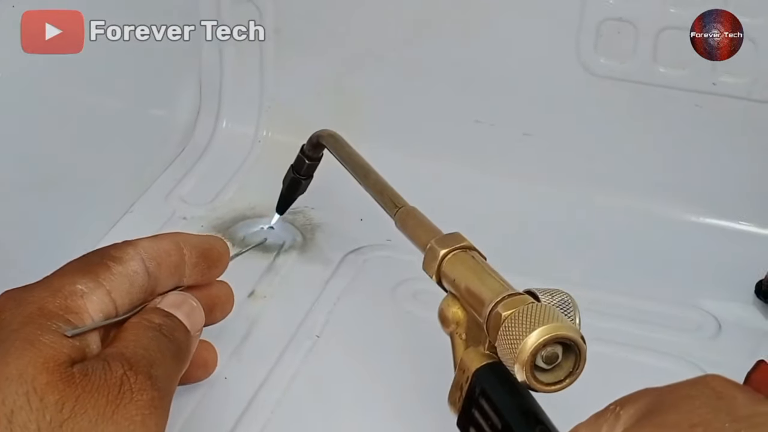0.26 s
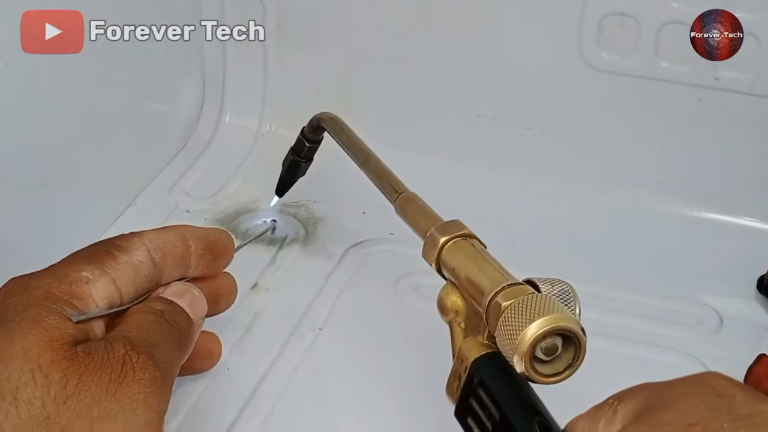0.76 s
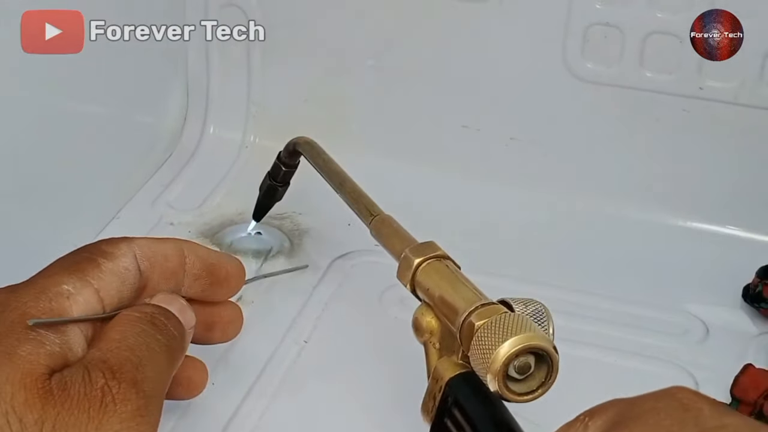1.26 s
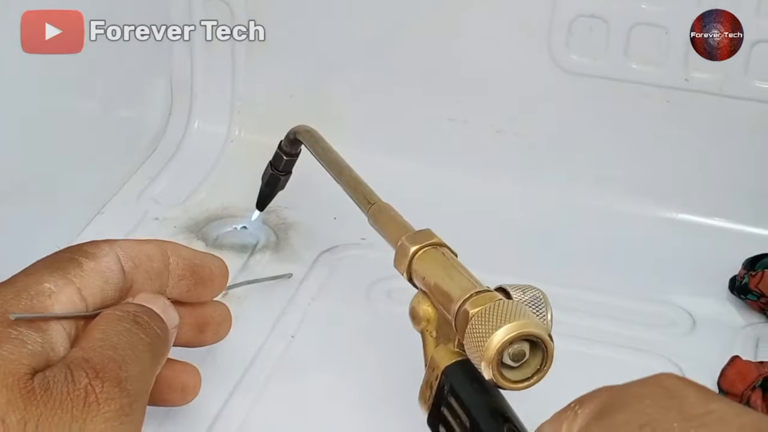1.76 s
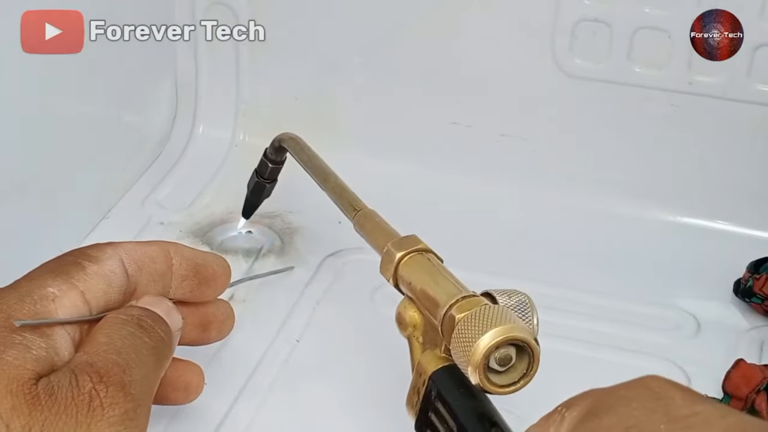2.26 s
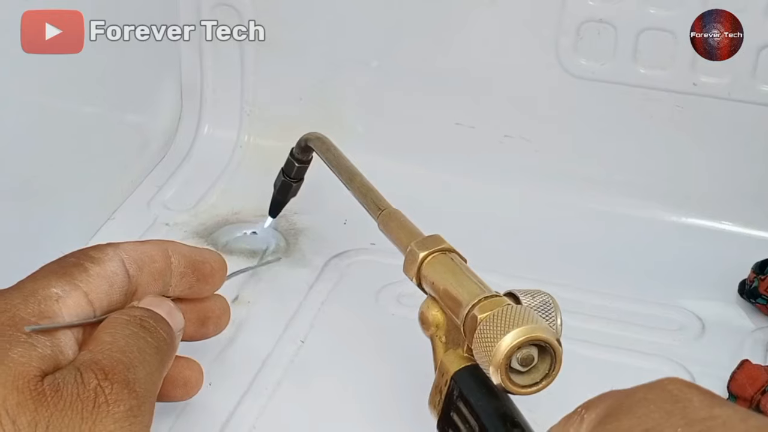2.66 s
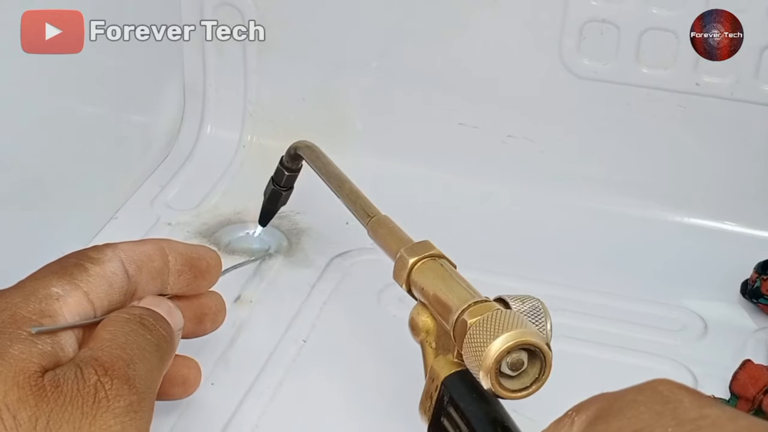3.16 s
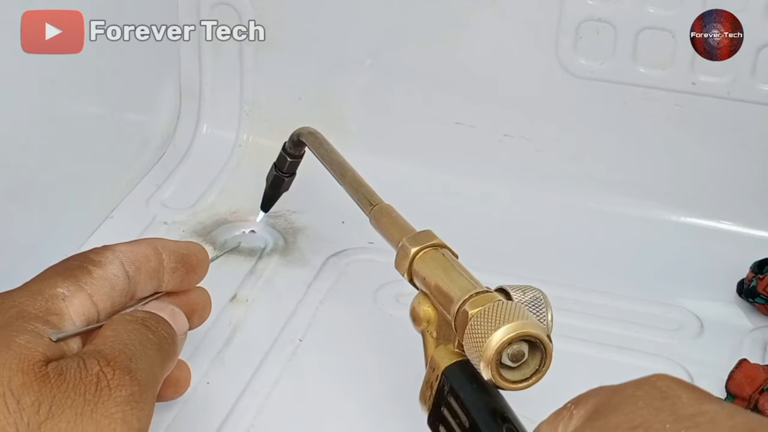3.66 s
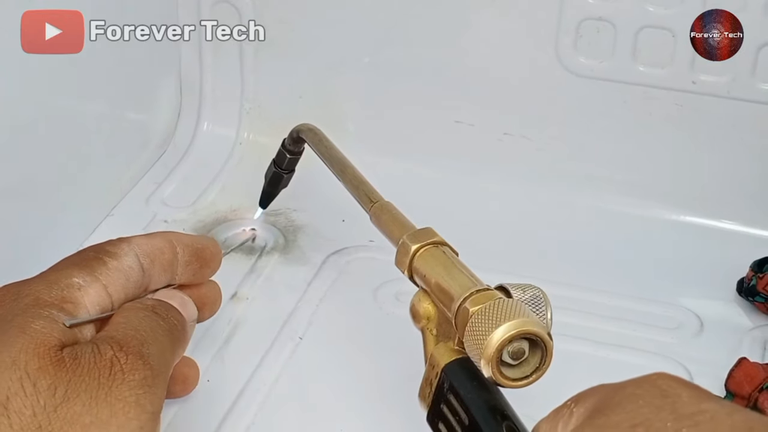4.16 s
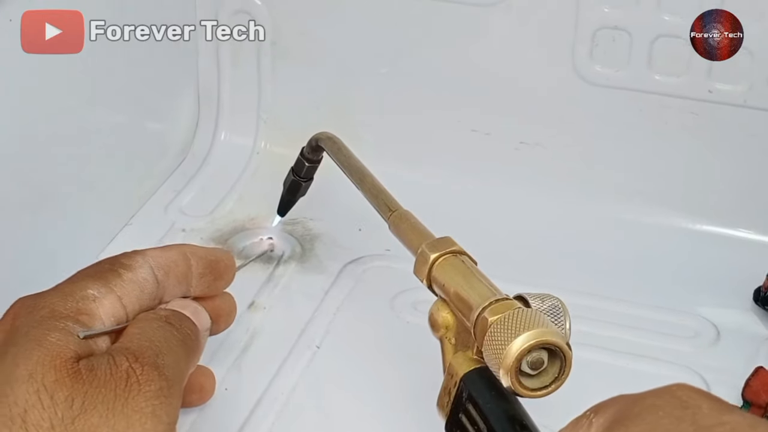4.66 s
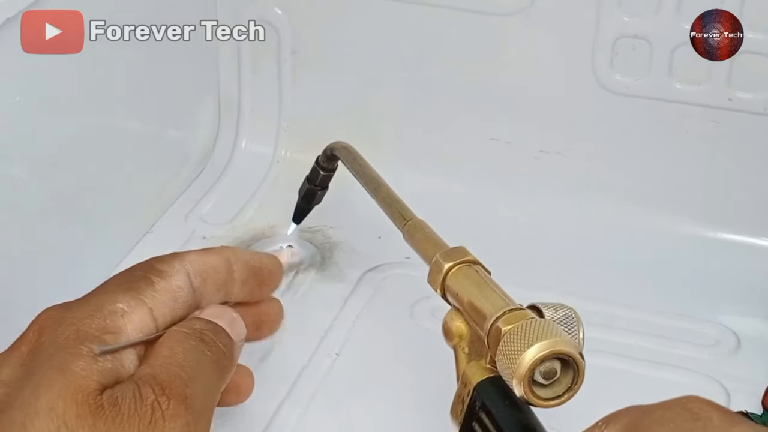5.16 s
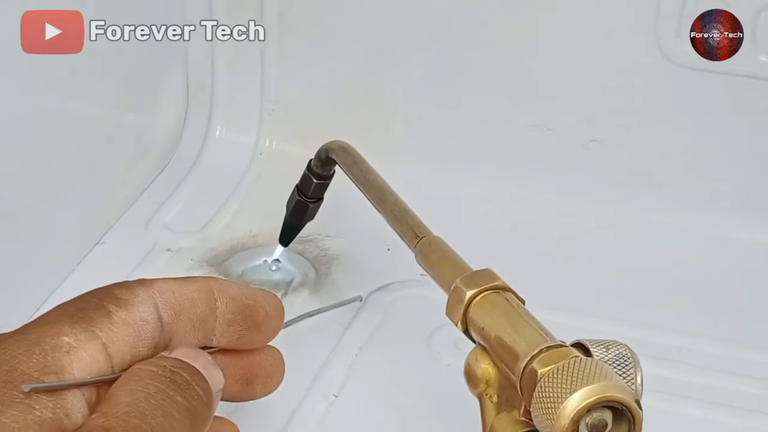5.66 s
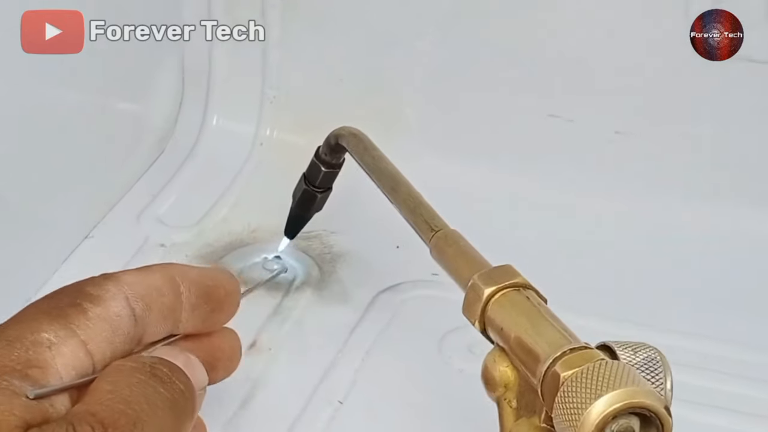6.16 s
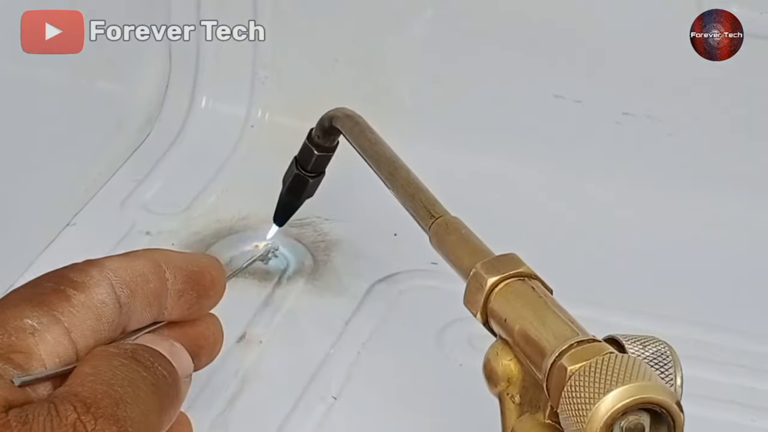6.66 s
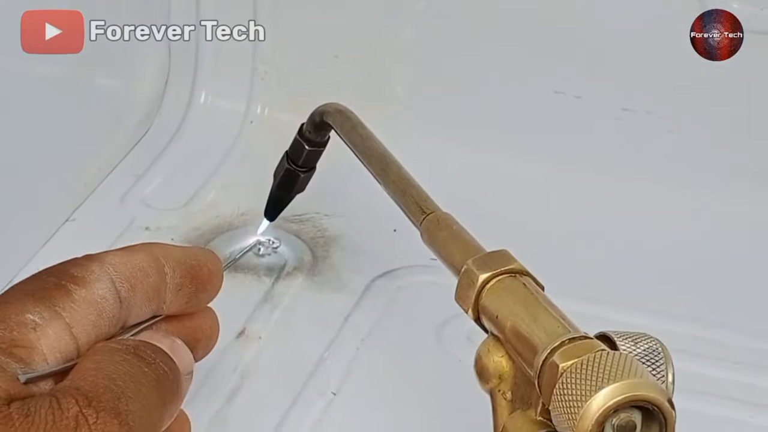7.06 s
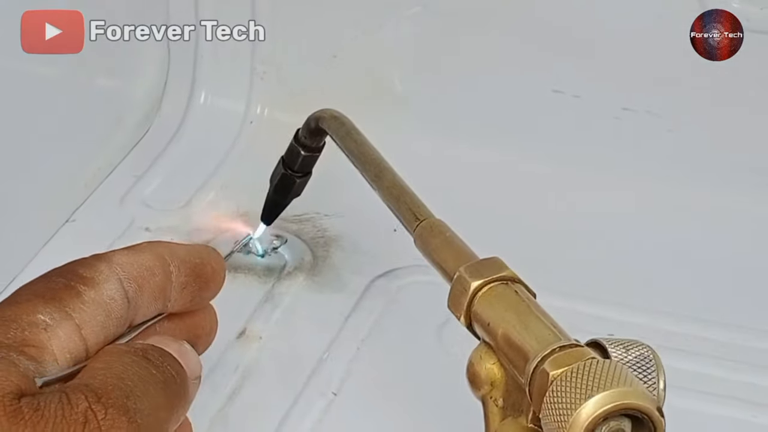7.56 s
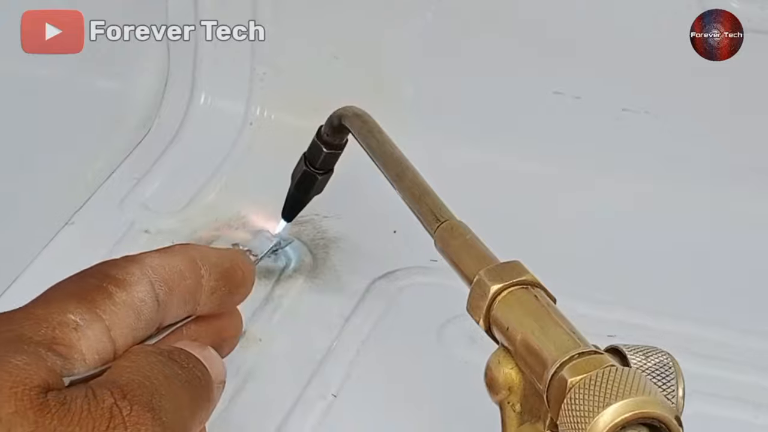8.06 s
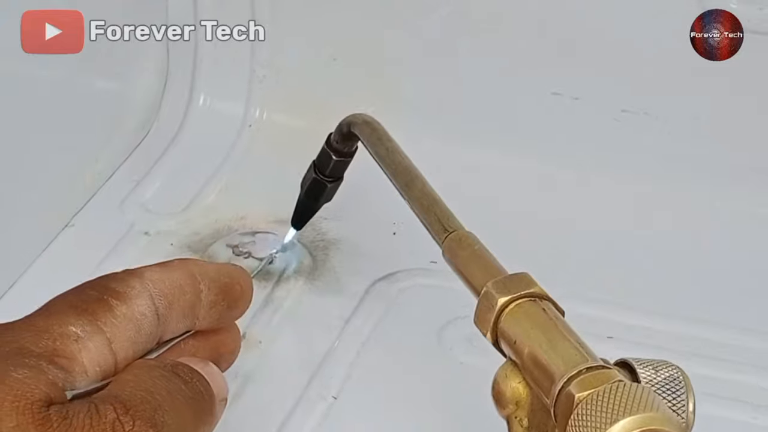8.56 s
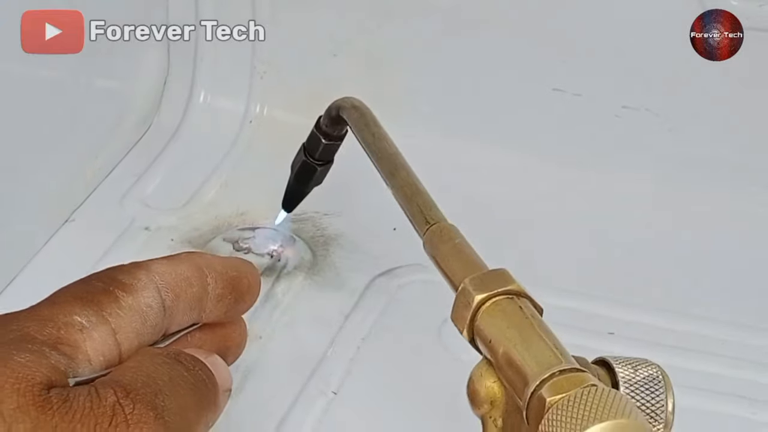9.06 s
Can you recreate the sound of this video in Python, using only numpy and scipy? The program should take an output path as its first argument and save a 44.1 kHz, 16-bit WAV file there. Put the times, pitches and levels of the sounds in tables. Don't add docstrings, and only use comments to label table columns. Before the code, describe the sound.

A small gas torch burns steadily inside a hollow metal cabinet, its bright hiss riding over a fluttering, popping roar, recorded close.

```python
import sys
import numpy as np
from scipy import signal
from scipy.fft import rfft, irfft
from scipy.io import wavfile
from scipy.ndimage import uniform_filter1d

SR = 44100
rng = np.random.default_rng(int(sys.argv[2]) if len(sys.argv) > 2 else 0)


def output_pcm(signal):
    pcm = np.clip(np.atleast_2d(signal).T, -1, 1) * 32767
    wavfile.write(sys.argv[1], SR, np.round(pcm).astype(np.int16))


def decibels_to_gain(level_db):
    exponent = np.asarray(level_db, float) / 20
    return 10 ** exponent


N = 410130

# time in seconds, flame strength in dB,
# jet sharpness in dB (how squarely the jet strikes the metal).
TORCH = [(0, 4, -5), (.55, -0.5, 0.5), (1.3, 1.5, -1), (1.65, 1.5, -6), (1.9, 1, 2.5), (2.4, 0.5, -1),
         (2.7, .5, -1.5), (3.35, 1, -0.5), (3.6, 0, 0), (4.2, -.5, 0.5), (4.85, 0.5, 0), (5.3, .5, 0),
         (5.85, -1, -5.5), (6.25, 0, 2), (7.2, -1, 0), (8.1, 1, -5), (8.85, 0, 4), (9.3, 1, -8)]
STILL_START_S, STILL_LENGTH_S, STILL_DB = 7.56, 0.292, -0.5


def evened(x):
    return x / np.sqrt(np.mean(x ** 2) + 1e-20)


def along(table, t):
    s, *columns = np.transpose(table)
    return [np.interp(t, s, column) for column in columns]


def wobble(lo_hz, hi_hz, count):
    hz = np.fft.rfftfreq(count, 1 / SR)
    spectrum = rfft(rng.standard_normal(count))
    return evened(irfft(spectrum * hz / (hz + lo_hz) / (1 + (hz / hi_hz) ** 2), count))


def span(t, start, length):
    return np.clip(np.minimum(t - start, start + length - t) / 0.01 + .5, 0, 1)


def flare_rows():
    # start in seconds, snap level in dB, low thud level in dB.
    strong_flares = [(0.319, -10.5, -22), (0.854, -15, -27), (0.933, -12, -24), (1.025, -17, -18.5),
                     (1.165, -21, -24), (1.496, -16, -36), (1.563, -18, -26), (1.803, -23, -35),
                     (2.024, -14, -39), (2.21, -18, -30), (2.565, -18, -23), (3.38, -8, -33),
                     (4.326, -7, -33), (4.558, -9, -20), (4.805, -7.5, -42), (4.998, -12, -21),
                     (5.223, -11, -19), (5.369, -11, -28), (5.437, -20, -31), (5.569, -10.5, -37),
                     (5.911, -13, -36), (6.205, -12, -36), (7.128, -22, -26), (7.265, -9, -26),
                     (7.334, -24, -28), (7.45, -9, -22), (7.94, -8, -30), (8.597, -14, -26),
                     (8.758, -9.5, -25), (9.064, -24, -32)]
    flares_per_s, spread_db = 36, 6
    s, snap_db, thud_db = np.transpose(strong_flares)
    gap, thud_chance, snap_chance = rng.random((400, 3)).T
    at = np.cumsum((.4 + 1.2 * gap) / flares_per_s)
    clear = abs(at[:, None] - s).min(1) > .025
    free = (at < N / SR) & clear & (span(at, STILL_START_S, STILL_LENGTH_S) < .5)
    small_thud_db = -4 + spread_db * (thud_chance - .5)
    small_snap_db = -4.5 + spread_db * (snap_chance - .5)
    times = np.r_[s, at[free]]
    thuds_db = -4.5 + np.r_[thud_db - thud_db.mean(), small_thud_db[free]]
    snaps_db = np.r_[snap_db - snap_db.mean() + 2, small_snap_db[free]]
    return times, thuds_db, snaps_db


def small_pops():
    pops_per_s, spread_db, clump_db, gust_share = 340, 2.0, 4, 0.24
    clumps = decibels_to_gain(clump_db * np.tanh(wobble(4.8, 32, N)))
    lit = rng.random(N) < pops_per_s / SR
    sign = rng.choice([-1., 1.], N)
    pops = lit * sign * decibels_to_gain(spread_db * np.minimum(rng.exponential(1, N), 1.8))
    gusts = rng.standard_normal(N)
    mix = np.sqrt(1 - gust_share) * evened(pops) + np.sqrt(gust_share) * gusts
    return signal.lfilter([1, -.97], [1, -.94], evened(clumps * mix))


def flares():
    thud_top_hz, snap_top_hz = 657, 1180
    s, thud_db, snap_db = flare_rows()
    trains = np.zeros((3, N + 600))
    chance = rng.random((len(s), 3, 2))
    for k, (spread_s, size) in enumerate([(.0002, 1), (.004, .75), (.008, 0.46)]):
        at = ((s + spread_s * chance[:, k, 0]) * SR).astype(int)
        push = np.where(chance[:, k, 1] < .75, size, -size)
        mark = 0 * s + (k == 0)
        trains[:, at] += decibels_to_gain([thud_db, snap_db, 0 * s]) * [push, push, mark]
    low_pass = signal.butter(2, thud_top_hz, fs=SR, output="sos")
    band_pass = signal.butter(2, [thud_top_hz, snap_top_hz], "band", fs=SR, output="sos")
    thuds = signal.sosfilt(low_pass, trains[0, :N])
    snaps = signal.sosfilt(band_pass, trains[1, :N])
    return decibels_to_gain(25) * (thuds + decibels_to_gain(-2.16) * snaps), trains[2, :N]


def roar():
    lull = 0.53
    lag_hz, lag_width_hz = 447, 206
    pops = small_pops()
    t = np.arange(N) / SR
    strength_db = along(TORCH, t)[0] + STILL_DB * span(t, STILL_START_S, STILL_LENGTH_S)
    bursts, marks = flares()
    near = np.clip(signal.oaconvolve(marks, np.hanning(900), "same"), 0, 1)
    flame = pops * decibels_to_gain(strength_db) * (lull + (1 - lull) * near) + bursts
    r = np.exp(-np.pi * lag_width_hz / SR)
    lag = [1, -2 * r * np.cos(2 * np.pi * lag_hz / SR), r * r]
    return evened(signal.lfilter(lag[::-1], lag, flame))


def jet():
    # start in seconds, length in seconds, hiss change in dB, fizz change
    # in dB, top change in dB.
    level_changes = [
        (7.61, 0.035, -2.5, -7, 1),
        (7.655, 0.1, -2.5, 2, 9.5),
        (7.72, 0.06, 0, -7, -8),
    ]
    hiss_follows, fizz_follows = 0.2, 0.12
    settle_db, settle_s = -2.5, .25
    fizz_from_hz, top_from_hz = 7600, 14000
    frames, hz = N // 256 + 5, np.fft.rfftfreq(1024, 1 / SR)
    real, imaginary, patches, ripples = rng.standard_normal((frames, 513, 4)).T
    patches = evened(uniform_filter1d(uniform_filter1d(patches, 24, 0), 8, 1))
    ripples = uniform_filter1d(ripples, 2, 0)
    ripples = uniform_filter1d(uniform_filter1d(ripples, 50, 1), 50, 1)
    broad = uniform_filter1d(ripples, 9, 0)
    ripples = evened(ripples - broad)
    shadows = evened(uniform_filter1d(broad, 60, 1))
    flicker = wobble(2.1, 34, frames * 256)[::256]

    treble = np.clip(hz / 11000, 0, 1)[:, None] ** 2
    ridge_db = 3.0 * np.clip(hz / 5000, 0, 1)[:, None] + 1.2 * treble
    field_db = (0.76 + 0.65 * treble) * patches + ridge_db * ripples
    field_db = field_db + 1.77 * treble * shadows + (0.79 + 0.21 * treble) * flicker

    t = np.arange(frames) * 256 / SR
    strength_db, sharp_db = along(TORCH, t)
    change_db = sum(np.outer(db, span(t, start, length)) for start, length, *db in level_changes)
    hiss_db = change_db[0] + hiss_follows * strength_db + settle_db * np.exp(-t / settle_s)
    fizz_db = change_db[1] + fizz_follows * sharp_db
    top_db = change_db[2] + sharp_db
    fizzy = 1 / (1 + (fizz_from_hz / (hz + 1)) ** 20)[:, None]
    top = 1 / (1 + (top_from_hz / (hz + 1)) ** 40)[:, None]
    level_db = (1 - fizzy) * hiss_db + (fizzy - top) * fizz_db + top * top_db
    spectra = (real + 1j * imaginary) * decibels_to_gain(field_db + level_db)
    return evened(signal.istft(spectra, nperseg=1024, noverlap=768)[1][:N])


def hollow(upper):
    # frequency in Hz, width in Hz, level in dB.
    lower = [(126.5, 33, -1), (415, 220, -5), (543.3, 44, -2.5), (653, 78, -7.5), (876, 153, 0.5),
             (1048.5, 56, -6.5), (1147, 15, -11), (1259, 135, -14.5), (1578, 174, -16), (1680, 51, -14),
             (1812, 92, -11.5), (1977, 320, -16), (2107, 29, -15), (2176, 43, -14.5), (2360, 115, -20.5),
             (2480, 67, -13.5), (2626, 103, -5), (2816, 304, -18), (2967, 41, -17), (3223, 123, -11),
             (3330, 59, -10.5), (3492, 152, -11)]
    # frequency in Hz, width in Hz, depth in dB.
    notches = [(490, 25, 4), (590, 25, 3), (728, 28, 11), (890, 20, 3), (955, 22, 7), (1445, 40, 5),
               (2140, 25, 6), (2255, 25, 5), (2490, 25, 6), (3625, 35, 6), (3985, 30, 4), (5390, 60, 4),
               (6645, 40, 5)]
    # frequency in Hz, level in dB.
    treble_curve = [(7400, -52), (7900, -19.5), (8400, -3), (8800, -2), (9400, -4), (10300, -10),
                    (11800, -11.5), (12100, -16), (13800, -10.5), (14300, -10), (14560, 0.5), (15100, -3),
                    (15280, 5.5), (15450, 0.57)]
    treble_db, bass_cut_hz = -13.5, 108
    chest = (120, 430, -12.5)
    hz = abs(np.fft.fftfreq(16384, 1 / SR))
    power = 0
    for f, width, db in [chest, *lower, *upper]:
        power = power + decibels_to_gain(db) ** 2 / (1 + (2 * (hz - f) / width) ** 2) ** 2
    f, db = np.transpose(treble_curve)
    power = power + decibels_to_gain(treble_db + np.interp(np.log(hz + 1), np.log(f), db, left=-90)) ** 2
    dips_db = sum(depth / (1 + (2 * (hz - f) / width) ** 2) for f, width, depth in notches)
    cut = (hz / bass_cut_hz) ** 8
    log_gain = np.log(np.sqrt(power * (cut + 0.01) / (1 + cut)) * decibels_to_gain(-dips_db) + 1e-5)
    return np.fft.ifft(np.exp(np.conj(signal.hilbert(log_gain)))).real[:6000]


def scene():
    # frequency in Hz, width in Hz, level in dB.
    upper_early = [(3714, 139, -13.7), (3931, 160, -9.1), (4221, 250, -12.1), (4427, 189, -5.8),
                   (4597, 71, -6.6), (4753, 211, -9.5), (4967, 66, -7.8), (5101, 155, -6.3),
                   (5271, 190, -5.1), (5580, 329, -2.8), (5967, 206, -11.5), (6098, 170, -12.0),
                   (6228, 91, -8.5), (6392, 181, -6.1), (6572, 90, -3.4), (6709, 228, -4.7),
                   (7089, 331, -12.8), (7454, 205, -13.4), (7817, 427, -19.2)]
    upper_late = [(3689, 162, -13.8), (3948, 172, -9.5), (4093, 101, -13.1), (4251, 184, -10.9),
                  (4445, 174, -6.5), (4590, 114, -5.8), (4779, 127, -6.6), (4946, 99, -7.5),
                  (5055, 72, -8.0), (5134, 131, -8.2), (5268, 155, -5.5), (5570, 260, -2.3),
                  (5892, 241, -7.4), (6163, 210, -10.8), (6372, 113, -8.1), (6557, 345, -5.0),
                  (6860, 109, -10.1), (7020, 251, -13.0), (7188, 152, -14.9), (7432, 307, -17.5),
                  (7666, 68, -23.2), (7897, 672, -21.2)]
    cross_hz = 1460
    low = signal.sosfilt(signal.butter(2, cross_hz, fs=SR, output="sos"), roar())
    high = signal.sosfilt(signal.butter(2, cross_hz, "high", fs=SR, output="sos"), jet())
    torch = decibels_to_gain(0.27) * low + high
    early = signal.oaconvolve(torch, hollow(upper_early))[:N]
    late = signal.oaconvolve(torch, hollow(upper_late))[:N]
    moved = np.interp(np.arange(N) / SR, (6, 7.4), [0, 1])
    return decibels_to_gain(-18.5) * evened((1 - moved) * early + moved * late)[None]


def top_cut(x):
    return signal.sosfilt(signal.butter(12, 16870, fs=SR, output="sos"), x)


def record(dry):
    limited = 0.76 * np.tanh(dry / 0.73)
    band_limit = signal.firwin(2001, 15520, window=("kaiser", 10), fs=SR)
    mix = signal.oaconvolve(limited, band_limit[None], "same")
    return top_cut(mix)


dry = scene()
out = record(dry)
output_pcm(out)
```